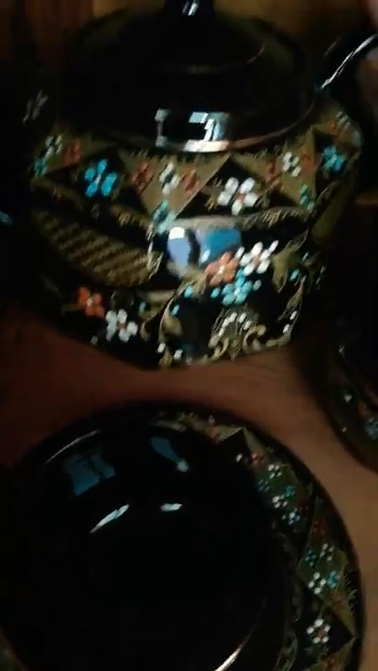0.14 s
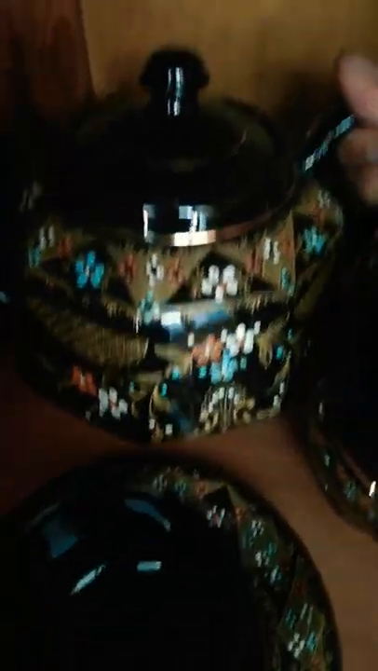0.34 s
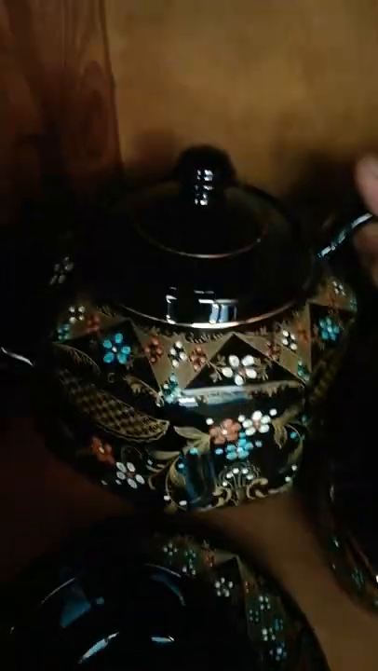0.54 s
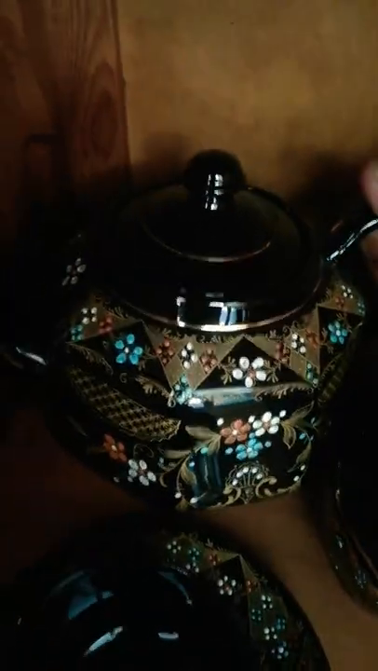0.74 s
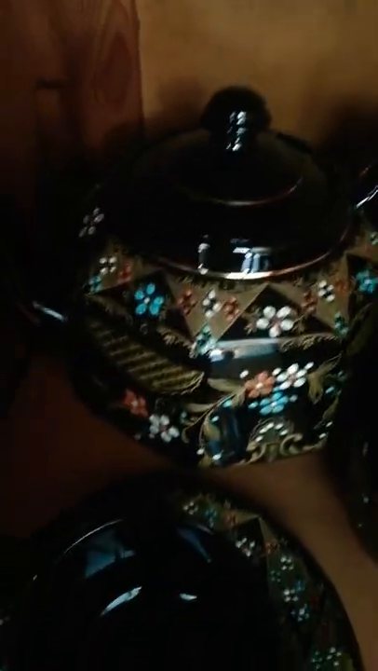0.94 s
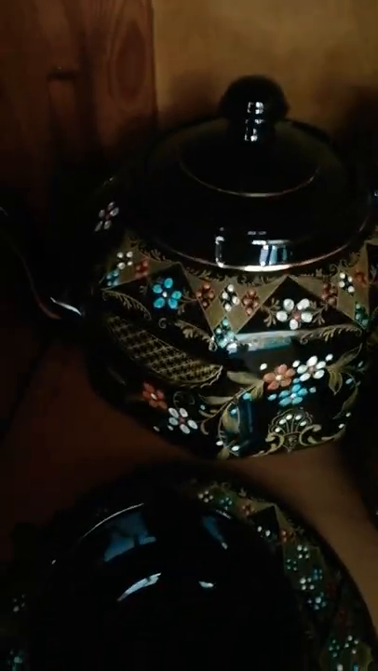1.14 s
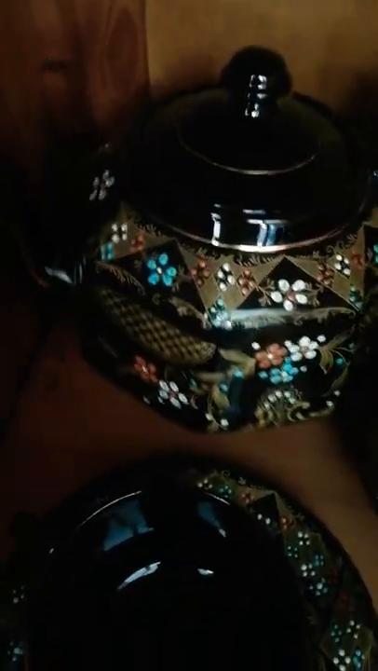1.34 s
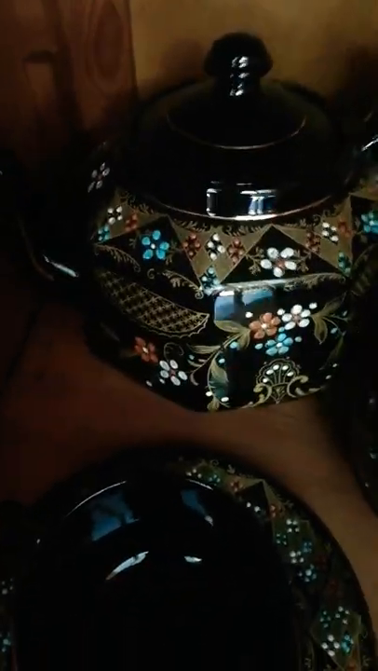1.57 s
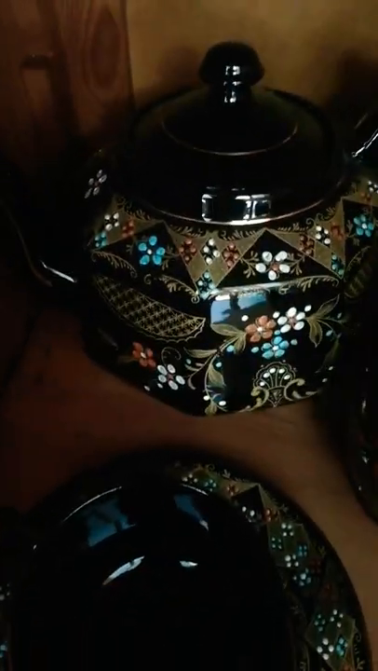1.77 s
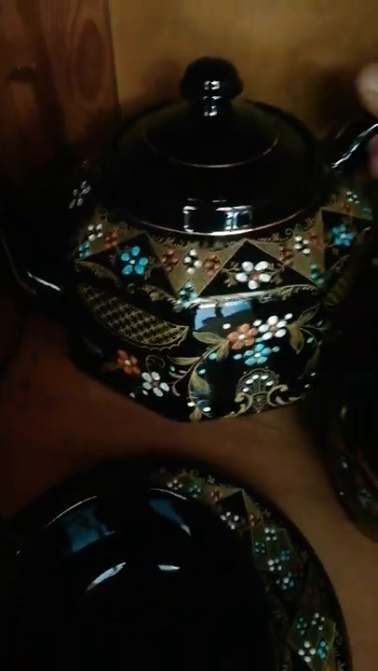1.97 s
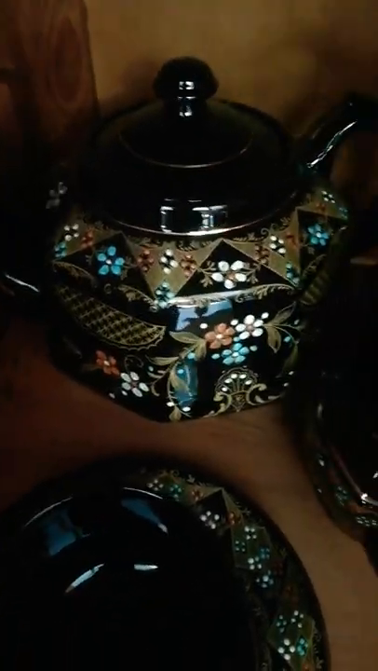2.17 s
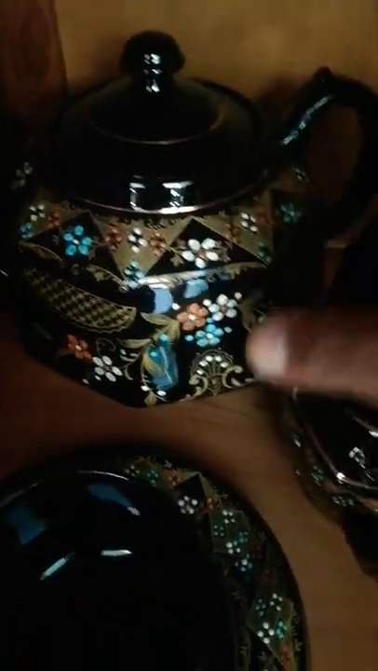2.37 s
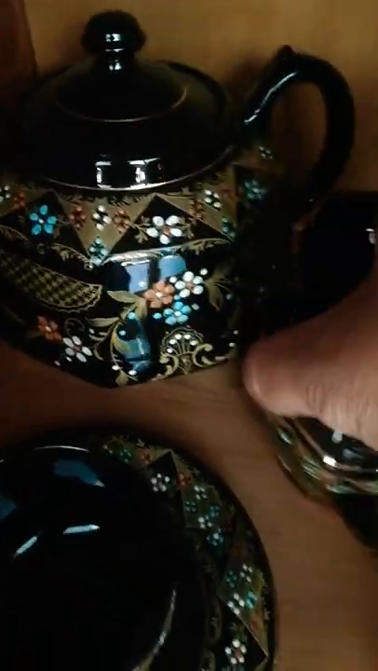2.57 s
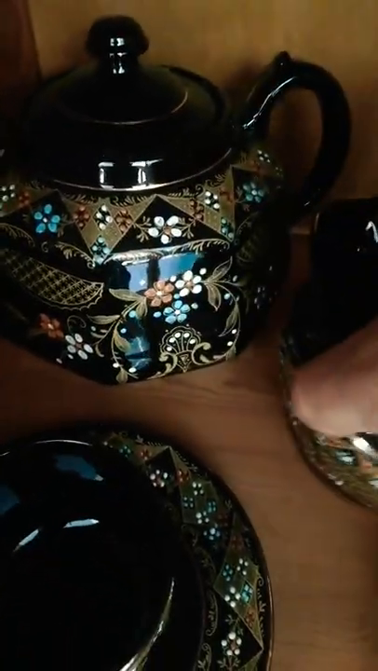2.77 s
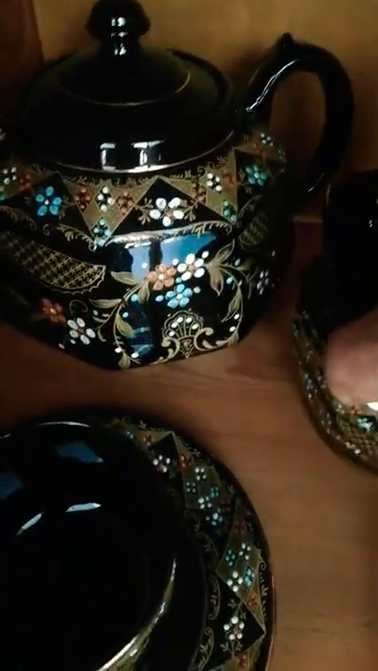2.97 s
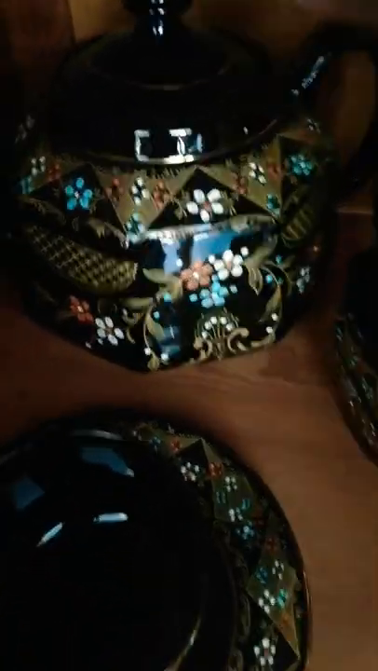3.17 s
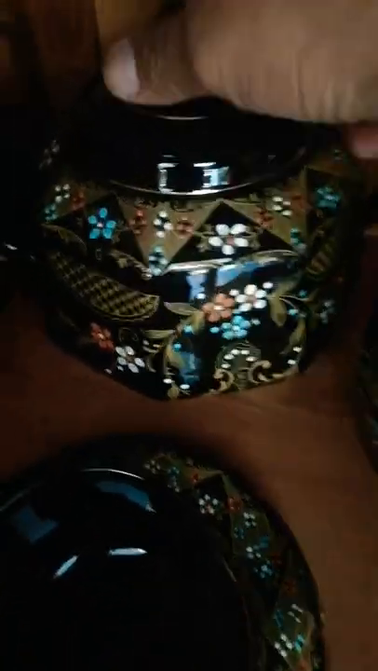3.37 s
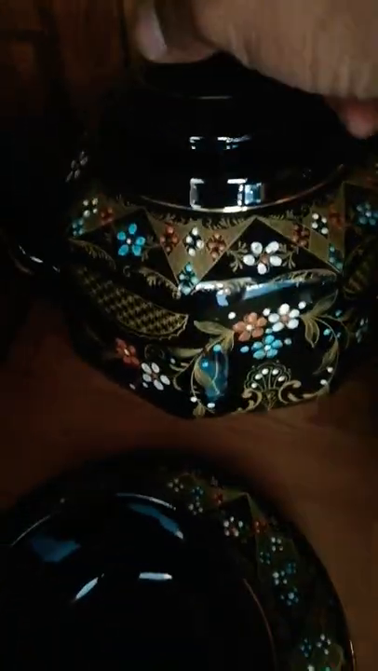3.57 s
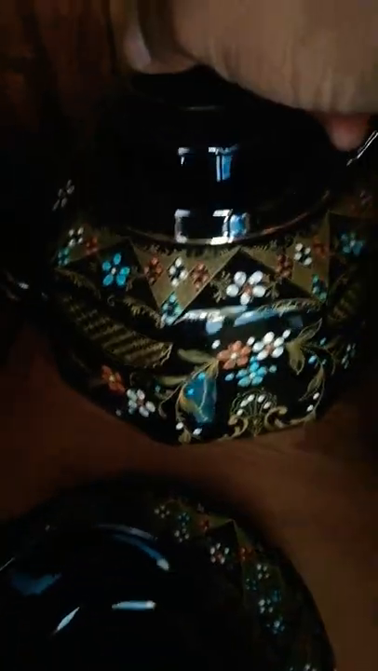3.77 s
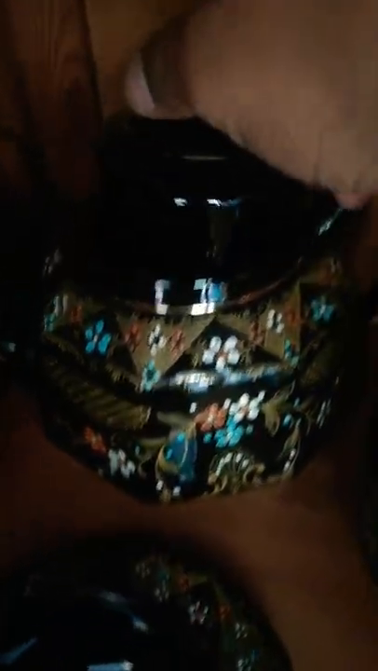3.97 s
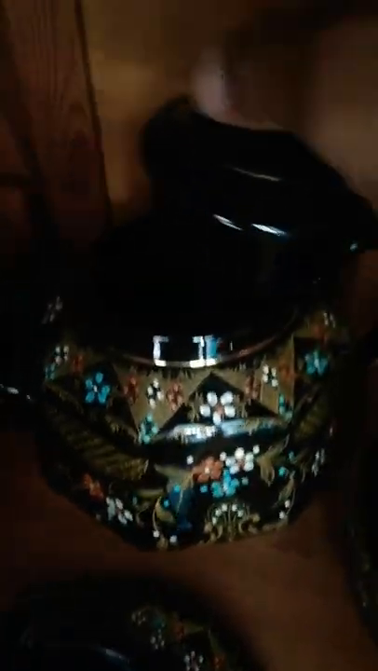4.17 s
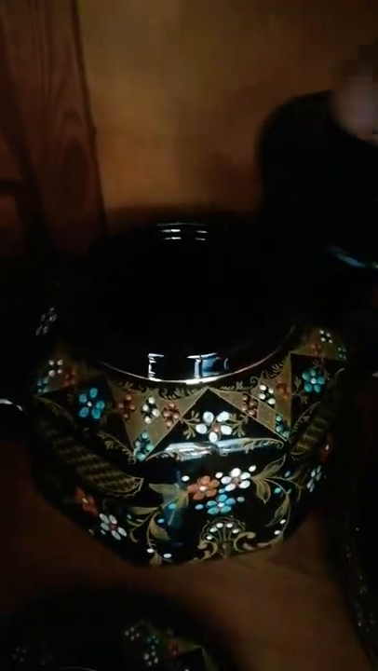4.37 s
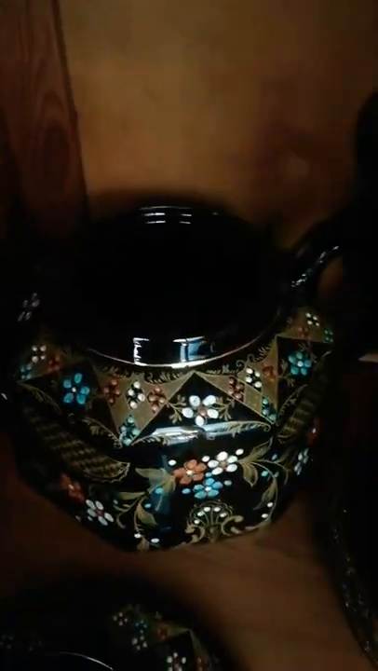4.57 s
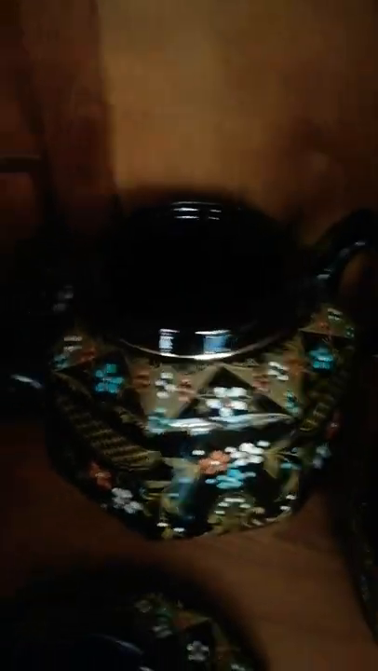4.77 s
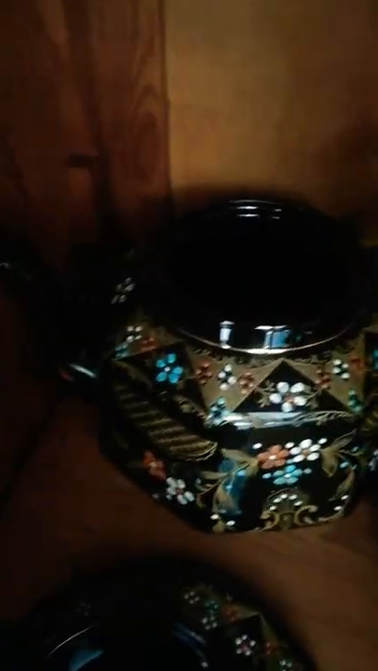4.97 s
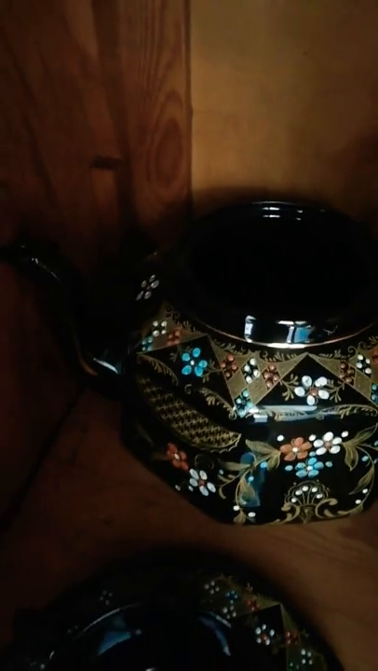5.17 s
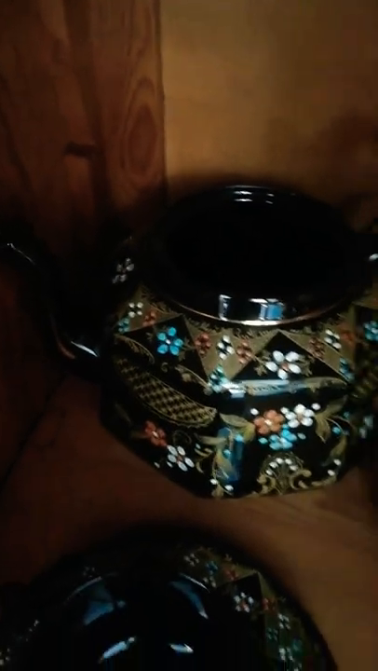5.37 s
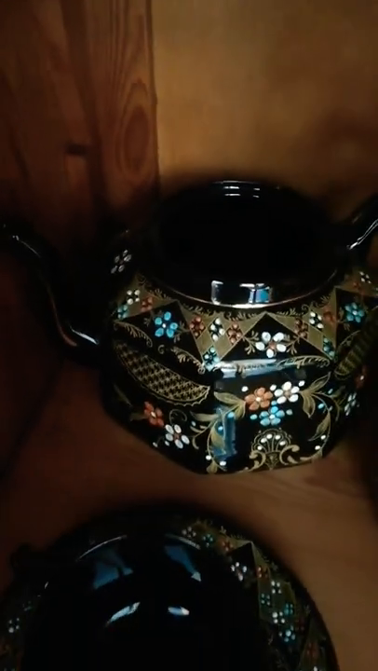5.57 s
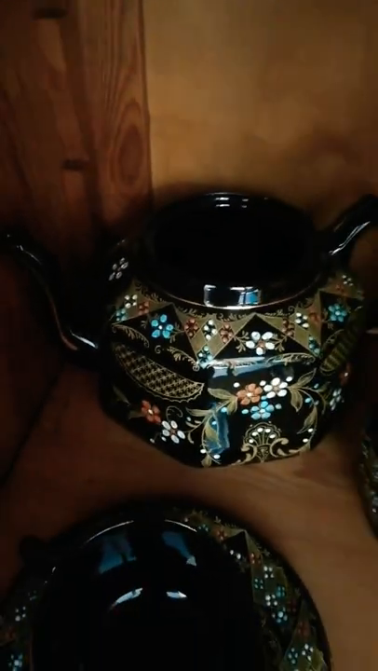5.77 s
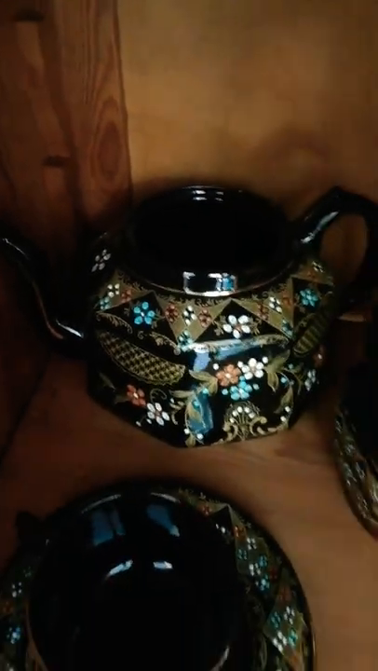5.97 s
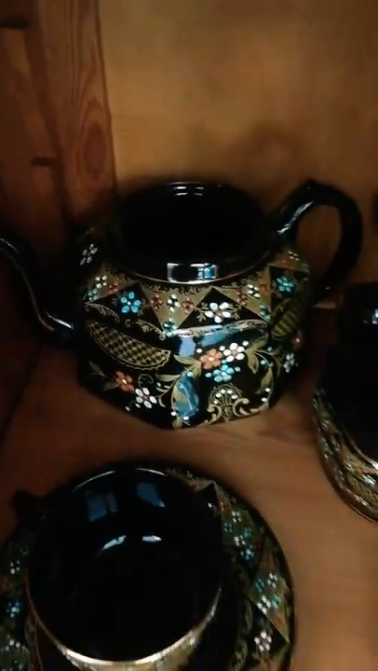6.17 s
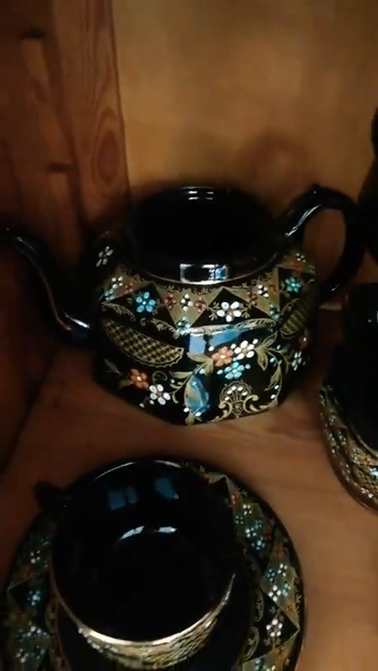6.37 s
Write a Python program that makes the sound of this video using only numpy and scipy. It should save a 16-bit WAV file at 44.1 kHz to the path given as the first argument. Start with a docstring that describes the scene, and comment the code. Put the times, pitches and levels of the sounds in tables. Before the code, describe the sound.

Close handling of a ceramic tea set: soft wooden bumps, gritty sliding, a hard teapot clunk, cup knocks, and a bright lid clink before near-silence.

```python
"""Glazed china is handled in a wooden cupboard, heard close by at two microphone ports.
At first the woodwork is bumped, stacked china clacks and pieces scrape along the shelf by stick-slip friction.
A teapot then knocks into the crockery as damped modes with a noisy crack; fingertips hiss over the glaze.
A cup and saucer slide and knock; then the teapot lid chatters in its seat and rings as it is lifted off.
Last comes a faint brush of skin; rumble and hiss of the room lie under everything."""
import sys
import numpy as np
from scipy import signal
from scipy.fft import rfft, irfft, next_fast_len
from scipy.io import wavfile
from scipy.ndimage import uniform_filter1d

SR = 44100
rng = np.random.default_rng(int(sys.argv[2]) if len(sys.argv) > 2 else 0)


def put_to_file(sound):
    """Save the sound as 16-bit audio at rate SR, in the file named by the first command-line argument."""
    columns = np.atleast_2d(sound).T  # one column per channel
    safe = np.clip(columns, -1, 1)
    whole_steps = np.round(safe * 32767)
    wavfile.write(sys.argv[1], SR, whole_steps.astype(np.int16))


N = 283563  # length [samples]
TOP_HZ = 15500  # upper limit of the sound
RING_TIME = np.arange(SR) / SR  # one second of ringing [s]


def undb(db):
    """Level law: decibels to amplitude gain."""
    return 10 ** (np.asarray(db) / 20)


def colour(x, points):
    """Linear filtering: shape x by (Hz, dB) points joined over log frequency."""
    hz, db = np.transpose(points)
    size = next_fast_len(x.shape[-1])
    bin_hz = np.arange(size // 2 + 1) * SR / size
    gain = undb(np.interp(np.log(bin_hz + 1), np.log(hz), db))
    return irfft(rfft(x, size) * gain, size)[..., :x.shape[-1]]


def tilted(points, tilt_db, pivot_hz):
    """Contact stiffness: a harder contact tips the spectrum towards the treble, in dB per octave."""
    return [(hz, db + tilt_db * np.log2(hz / pivot_hz)) for hz, db in points]


def field(points, size, grain=0., apart_hz=900):
    """Spatial coherence: noise of rms 1, alike at both ports in the bass and less so in the treble."""
    loudness = np.exp(grain * rng.standard_normal(size))  # grain makes the noise gritty
    mid, side = rng.standard_normal((2, size)) * loudness
    side = signal.sosfilt(signal.butter(1, apart_hz, "high", fs=SR, output="sos"), side)
    x = colour(np.array([mid + side, mid - side]), points)
    return x / np.sqrt(np.mean(x ** 2))


def decay(t60):
    """Exponential damping: 60 dB lost in t60 seconds."""
    return np.exp(-np.log(1000) * RING_TIME / t60)


def fade(t60, rise_s):
    """Transient response: a quick swell, then an exponential decay."""
    return (1 - np.exp(-RING_TIME / rise_s)) * decay(t60)


def walk(rate):
    """Slow random fluctuation: chance values, rate per second, joined by straight lines."""
    k = int(SR / rate)
    return uniform_filter1d(np.repeat(rng.standard_normal(N // k + 1), k), k)[:N]


def add(out, s, x):
    """Superposition: mix x in at time s."""
    i = int(s * SR)
    out[:, i:i + x.shape[1]] += x[:, :N - i]


def slips(size, rate, spread):
    """Stick-slip: lone slips of very unequal size, each a short burst in the gain on the friction."""
    slip_s = 0.001  # decay time constant
    size_db = spread * np.minimum(rng.exponential(size=size), 4)
    kicks = (rng.random(size) < rate / SR) * undb(size_db)
    return 1 + signal.lfilter([1], [1, -np.exp(-1 / (slip_s * SR))], kicks)


def stroke(start, end, edge_s):
    """Kinematics: a hand gathers pace, holds and comes to rest; a long stroke eases more slowly."""
    t = np.arange(N) / SR
    ease_s = edge_s + 0.08 * (end - start)  # a share of the stroke goes into gathering pace
    return (np.tanh((t - start) / ease_s) - np.tanh((t - end) / ease_s)) / 2


def contacts(knocks):
    """Repeated impact: each knock rebounds at widening gaps; gives (s, dB, brightness) in order."""
    gap_growth = 1.4  # a rocking piece works loose: each gap is this much longer than the last
    out = []
    for s, db, tilt_db, count, gap_s, loss_db in knocks:
        for k in range(round(count)):
            out.append((s, db - k * loss_db, tilt_db))
            s = s + gap_s * gap_growth ** k
    return sorted(out)


# wooden board under a blow: (frequency [Hz], relative density [dB per Hz])
BOARD_SPECTRUM = [(30, -23.5), (70, -10.5), (130, -6), (210, -8.5), (260, 11), (340, -18.5), (470, 9),
                  (580, -12), (760, 2), (1100, -14), (1600, -16.5), (3000, -32.5)]
# low boom of the cupboard: (frequency [Hz], relative density [dB per Hz])
RUMBLE_SPECTRUM = [(40, -20.5), (85, -3), (130, 8), (170, -8.5), (210, 7), (270, -2), (380, -18),
                   (700, -47.5)]


def board():
    """Structure-borne sound: a short wooden knock, with the cupboard's lows staying longer."""
    knock = fade(t60=0.19, rise_s=0.0013) * field(BOARD_SPECTRUM, len(RING_TIME))
    lows = fade(t60=0.49, rise_s=0.0013) * field(RUMBLE_SPECTRUM, len(RING_TIME))
    return knock + undb(-8.0) * lows


# between close contacts a piece still touches its seat: longest such gap [s],
# spread of its mode frequencies [share], factor on their damping
RATTLE_GAP_S, RATTLE_DETUNE, RATTLE_DAMPING = 0.04, 0.005, 1.25
BOARD_OCTAVES = 2.4  # the board answers this far below the china, so dull knocks shake it more


def china(hits, modes, crack, ring_db, minor_db, minor_t60, crack_db, crack_t60,
          grind_db, echo_db, board_db, pivot_hz):
    """Modal impact: each contact rings the modes, cracks sharply, grinds briefly and knocks the board."""
    out, span = np.zeros((2, N)), len(RING_TIME)
    # weak, short modes crowd between the strong ones
    minor_hz = rng.uniform(500, TOP_HZ, size=125)
    minor = [(f, minor_db + np.interp(f, *np.transpose(crack)), minor_t60) for f in minor_hz]
    hz, mode_db, t60 = np.transpose(list(modes) + minor)
    # short waves meet the two ports at different phases
    lean = np.pi / 4 * np.minimum(hz / 1400, 1) * rng.choice([-1, 1], len(hz))
    swing = 1e-9 * np.exp(1j * np.array([lean, -lean]))  # almost at rest
    # the near cupboard walls swell each blow for a few ms; the room adds a faint tail
    swell = 1 - np.exp(-RING_TIME / .0012)
    room_tail = undb(echo_db) * fade(t60=0.47, rise_s=0.0087)
    crack_shape = swell * decay(crack_t60) + room_tail
    grind_shape = undb(grind_db) * fade(t60=0.16, rise_s=0.004)

    blows = contacts(hits)
    gaps = np.diff([int(s * SR) for s, _, _ in blows] + [N])
    for (s, db, tilt_db), gap in zip(blows, np.clip(gaps, 1, span)):
        # every mode is a decaying rotation, followed until the next contact
        rattling = gap < RATTLE_GAP_S * SR
        bent_hz = hz * (1 + rattling * RATTLE_DETUNE * rng.standard_normal(len(hz)))
        damping = np.log(1000) / t60 * (RATTLE_DAMPING if rattling else 1)
        turn = np.exp((2j * np.pi * bent_hz - damping) / SR)
        rings = np.cumprod(np.broadcast_to(turn[:, None], (len(hz), gap)), axis=1)
        # the point of contact favours some high modes
        place_db = 3 * np.minimum(hz / 3000, 1) * rng.standard_normal(len(hz))
        size = undb(db + ring_db + mode_db + tilt_db * np.log2(hz / pivot_hz) + place_db)
        # the piece has moved a little
        shift = np.exp(1j * np.minimum(hz / 10000, 1) * rng.standard_normal((2, len(hz))))
        # a kick lands about a quarter turn off the running swing, so their energies add
        quarter_turn = 1j * rng.choice([-1, 1], len(hz))
        kick = size * quarter_turn * np.exp(1j * np.angle(swing)) * shift
        add(out, s, (swing @ rings + swell[:gap] * (kick @ rings)).imag)
        swing = (swing + kick) * rings[:, -1]

        grit = field(tilted(crack, tilt_db, pivot_hz), span, grain=0.93)  # glaze chatters on glaze
        grind = grind_shape * (slips(span, rate=250, spread=3.2) - 1)
        add(out, s, undb(db + crack_db) * (crack_shape + grind) * grit)
        add(out, s, undb(db + board_db - BOARD_OCTAVES * tilt_db) * board())
    return out


# ringing modes of the lid and the rim it sits in, with the cupboard's low mode at 458 Hz: (frequency [Hz],
# relative level [dB], free decay t60 [s])
LID_RINGING = [(458, -30, 0.53), (1526, -24.5, 0.24), (2015.4, -22, 0.68), (2690, -21, 0.3),
               (2720, -18.5, 0.46), (3200, -16.5, 0.36), (3370, -25.5, 0.35), (3800, -14.5, 0.36),
               (3704, -15.5, 0.52), (4245, -14, 0.25), (5728, -17.5, 0.14), (6030, -16.5, 0.13),
               (6492, -13, 0.17), (6659, -15.5, 0.16), (7660, -19.5, .09), (8360, -13.5, .1),
               (8560, -3, 0.15), (9700, -13.5, 0.11), (10080, -7, 0.1), (10300, -4.5, 0.1),
               (11600, -16.5, 0.11), (14230, -14.5, 0.1)]
# crack and minor modes of the lid: (frequency [Hz], relative density [dB per Hz])
LID_CRACK_SPECTRUM = [(300, -22.5), (1000, -9.5), (2200, -7.5), (3200, -5.5), (3900, 1), (5000, -10.5),
                      (6200, -5), (7200, -9.5), (8600, -0.5), (10400, -5.5), (12000, -7.5), (13500, -24.5),
                      (14400, -11.5), (15500, -30.5)]
# lid knocks: (time [s], relative level [dB], brightness [dB per octave], contacts [count],
# gap to the first rebound [s], loss per rebound [dB])
LID_KNOCKS = [(3.4995, -31.5, -3.5, 2, 0.0072, 1.5), (3.611, -20, -.5, 2, 0.03, 0),
              (3.689, -31, -2.5, 2, 0.035, 2.5), (3.8845, -13, 2, 3, 0.0055, 3.5),
              (3.911, -17.5, 1.5, 2, 0.013, 0.5), (3.94, -19, 2.5, 2, 0.0039, 1.5)]


def teapot_lid():
    """Modal ringing of a light shell: the lid chatters in its seat, bright and long."""
    return china(LID_KNOCKS, LID_RINGING, LID_CRACK_SPECTRUM, ring_db=5.0, minor_db=-17.5, minor_t60=0.1,
                 crack_db=-5.5, crack_t60=0.031, grind_db=-6.5, echo_db=-31.5, board_db=-14.0, pivot_hz=5986)


# ringing modes of the teapot body standing on the board:
# (frequency [Hz], relative level [dB], free decay t60 [s])
POT_RINGING = [(262, 3.5, 0.23), (461.3, -12, 0.3), (681, -11, 0.23), (1242, -6.5, 0.15),
               (1495.5, -22.5, 0.42), (1631, -26, 0.98), (2480, -8, 0.053), (3840, -17, 0.17),
               (4360, -25, 0.14), (5600, -16, 0.074), (6500, -16, 0.094), (8395, -6.5, 0.07),
               (10360, -12, 0.13), (10730, -11, 0.07)]
# crack and minor modes of the teapot: (frequency [Hz], relative density [dB per Hz])
POT_CRACK_SPECTRUM = [(100, -13.5), (300, -1.5), (900, 5), (1500, -1.5), (2500, -7.5), (3200, -12.5),
                      (5500, -13), (7200, -26.5), (8500, -20.5), (10500, -19), (13000, -26.5), (15500, -27)]
# teapot knocks: (time [s], relative level [dB], brightness [dB per octave], contacts [count],
# gap to the first rebound [s], loss per rebound [dB])
POT_KNOCKS = [(1.6735, -12.5, -4.5, 1, 0, 0), (1.682, -12.5, 1, 3, .008, 0.6),
              (1.710, -14, 1.5, 2, .014, 3), (1.785, -31.5, 0, 1, 0, 0)]


def teapot():
    """Modal ringing of a heavy shell: the pot knocks into the crockery, strongest in its low modes."""
    return china(POT_KNOCKS, POT_RINGING, POT_CRACK_SPECTRUM, ring_db=-2.0, minor_db=-14.5, minor_t60=.06,
                 crack_db=3.5, crack_t60=0.071, grind_db=-13.5, echo_db=-28.5, board_db=-10.0, pivot_hz=710)


# ringing modes of a cup: (frequency [Hz], relative level [dB], free decay t60 [s])
CUP_RINGING = [(1420, -13, 0.62), (1462, -12, 0.33), (2660, -5, 0.07), (3275, -7, .33), (4480, -3, 0.065),
               (6465, -1, 0.047), (9860, 0, 0.06)]
# crack and minor modes of cup, pressed and stacked china: (frequency [Hz], relative density [dB per Hz])
CUP_CRACK_SPECTRUM = [(200, -18), (800, 6.5), (1400, -3), (2100, -8), (2800, -9.5), (4500, -11.5),
                      (7000, -12), (10000, -13), (12500, -13.5), (15000, -40.5)]
# cup knocks: (time [s], relative level [dB], brightness [dB per octave], contacts [count],
# gap to the first rebound [s], loss per rebound [dB])
CUP_KNOCKS = [(2.644, -38, -3.5, 1, 0, 0), (2.665, -43.5, -4, 1, 0, 0), (2.8525, -29.5, 0, 1, 0, 0),
              (2.857, -26.5, 1, 1, 0, 0)]


def cup():
    """Modal ringing of a small shell: the cup knocks as it is slid aside."""
    return china(CUP_KNOCKS, CUP_RINGING, CUP_CRACK_SPECTRUM, ring_db=3.5, minor_db=-7.5, minor_t60=0.067,
                 crack_db=-3.0, crack_t60=0.049, grind_db=-14, echo_db=-16, board_db=-2.5, pivot_hz=1460)


# ringing modes of china pressed down onto its seat:
# (frequency [Hz], relative level [dB], free decay t60 [s])
PRESSED_RINGING = [(458, -13.5, 0.34), (766, 5.5, 0.072), (2760, -14, 0.15), (4450, -2.5, 0.057),
                   (9450, -8.5, 0.11)]
# knocks of pressed china: (time [s], relative level [dB], brightness [dB per octave], contacts [count],
# gap to the first rebound [s], loss per rebound [dB])
PRESSED_KNOCKS = [(.0995, -26.5, -0.4, 2, .0055, 0.46), (3.438, -24.5, .5, 2, .028, 5.9)]


def pressed_china():
    """Contact damping: china held down on its seat gives mostly short, dull modes."""
    return china(PRESSED_KNOCKS, PRESSED_RINGING, CUP_CRACK_SPECTRUM, ring_db=-2.0, minor_db=-11,
                 minor_t60=0.089, crack_db=-4.5, crack_t60=0.042, grind_db=-15, echo_db=-18.5,
                 board_db=-12.5, pivot_hz=1510)


# ringing modes of a piece damped by its stack:
# (frequency [Hz], relative level [dB], free decay t60 [s])
STACKED_RINGING = [(1020, 1, .08), (1260, 4, 0.08), (2640, -12, .2), (2826, -16, 0.33), (3569, -11, .17),
                   (4872, -7, 0.14), (7628, -5, 0.08), (10300, -4, 0.08)]
# knocks of stacked china: (time [s], relative level [dB], brightness [dB per octave], contacts [count],
# gap to the first rebound [s], loss per rebound [dB], negative for a gain)
STACKED_KNOCKS = [(.3725, -23, 1, 1, 0, 0), (.395, -32.5, 0.5, 2, .017, -2), (.590, -45, -7, 2, .022, 4),
                  (1.048, -38.5, -4.5, 1, 0, 0), (1.528, -42, -7, 1, 0, 0)]


def stacked_china():
    """Contact damping: a piece in a stack clacks with shortened modes."""
    return china(STACKED_KNOCKS, STACKED_RINGING, CUP_CRACK_SPECTRUM, ring_db=-7.5, minor_db=-15.5,
                 minor_t60=0.11, crack_db=1, crack_t60=0.013, grind_db=-16.5, echo_db=-25.5,
                 board_db=-13, pivot_hz=1448)


# pushes that slide a piece over the shelf:
# (start [s], end [s], relative scrape level [dB], hiss over scrape [dB])
PUSHES = [(0.218, 0.443, -54.5, 6), (0.465, 0.578, -56, -8), (0.72, 0.919, -50, -7),
          (1.027, 1.071, -49.5, -11), (1.122, 1.188, -60, 5.5), (1.284, 1.527, -48, -2.5),
          (1.589, 1.724, -45, 2), (2.569, 2.655, -46.5, -11), (2.641, 2.763, -40.5, -5),
          (2.772, 2.869, -49.5, -13), (2.857, 2.989, -41.5, -10.5)]
# scrape of the foot rings: (frequency [Hz], relative density [dB per Hz])
SCRAPE_SPECTRUM = [(250, -22.5), (470, 6), (600, -6), (800, 4.5), (1000, -5), (1400, -8), (2100, -16.5),
                   (2700, -15.5), (5000, -28.5)]
# hiss over the glaze: (frequency [Hz], relative density [dB per Hz])
HISS_SPECTRUM = [(900, -3), (1700, 2), (2800, -1.5), (3500, -1.5), (4200, -4), (6500, -2), (8200, -6),
                 (10500, 5), (12000, -2), (15000, -11)]
# the hand leans on the shelf and shakes it, ever more lightly
LEAN_START_S, LEAN_END_S, LEAN_DB, LEAN_EASE_DB_PER_S = 0.0045, 1.3, -34, 12


def sliding(rumble_db, scrape_db, hiss_db, uneven_db, wall_db, edge_s, linger_s):
    """Stick-slip friction: uneven slips shake the board, scrape the foot rings and hiss over the glaze."""
    rub, effort, i = np.zeros((2, N)), 0, np.arange(SR)
    for start, end, db, bright_db in PUSHES:
        speed = undb(db) * stroke(start, end, edge_s)
        first = int(start * SR) - SR // 10
        scrape = undb(scrape_db) * field(SCRAPE_SPECTRUM, SR, grain=0.9)
        hiss = undb(hiss_db + bright_db) * field(HISS_SPECTRUM, SR, grain=1.0)
        push = speed[first:first + SR] * (scrape + hiss) * slips(SR, rate=110, spread=0.92)
        # reflections from the cupboard walls comb each push differently, and shift as the piece moves
        drift = 1 + .08 * rng.standard_normal((2, 6, 1)) * i / SR
        lags = rng.uniform(SR / 1500, SR / 220, (2, 6, 1)) * drift
        echoes = np.array([sum(np.interp(i - lag, i, port) for lag in paths)
                           for port, paths in zip(push, lags)])
        add(rub, first / SR, push + undb(wall_db) * echoes)
        effort = effort + speed
    lean_db = LEAN_DB - LEAN_EASE_DB_PER_S * np.arange(N) / SR
    lean = undb(lean_db) * stroke(LEAN_START_S, LEAN_END_S, edge_s)
    keep = np.exp(-1 / (linger_s * SR))
    # the board booms on after a stroke
    rumble = signal.lfilter([1 - keep], [1, -keep], np.hypot(effort, lean))
    catch = undb(uneven_db * (walk(rate=38) + walk(rate=13)))  # the foot ring catches and lets go
    return rub * catch + undb(rumble_db) * rumble * field(RUMBLE_SPECTRUM, N)


# soft bumps of the hand against the woodwork: (time [s], level [dB], brightness [dB per octave])
HAND_BUMPS = [(0.042, -28, 6), (1.06, -35, 5), (1.232, -40.5, 0.5), (1.472, -26, -0.5), (1.53, -24.5, -4.5),
              (1.68, -20.5, 4), (2.045, -25.5, 2.5)]
# woodwork under a soft bump: (frequency [Hz], relative density [dB per Hz])
BUMP_SPECTRUM = [(30, -27.5), (50, -1.5), (75, -6), (120, 6.5), (200, -1), (280, -6.5), (400, -25.5),
                 (800, -45), (3000, -87.5)]
# decay of a neutral bump [s]; brightness that halves it [dB per octave]
BUMP_T60_S, BUMP_HALVING_DB = 0.3, 6.5


def bumps():
    """Soft impact: long contacts drive mainly low cupboard modes; the deeper the bump, the longer it booms."""
    out = np.zeros((2, N))
    for s, db, tilt_db in HAND_BUMPS:
        t60 = BUMP_T60_S * 2 ** (-tilt_db / BUMP_HALVING_DB)
        boom = field(tilted(BUMP_SPECTRUM, tilt_db, pivot_hz=120), SR)
        add(out, s, undb(db) * fade(t60, rise_s=0.0017) * boom)
    return out


# fingertips brushing the glaze: (start [s], end [s], relative hiss level [dB])
FINGER_BRUSHES = [(2.055, 2.112, -47.5), (2.12, 2.16, -52), (2.17, 2.508, -67.5), (4.573, 4.852, -63.5)]


def brushing(level_db, bright_db, edge_s):
    """Friction noise: skin on glaze gives a thin, high hiss and no ringing."""
    touch = sum(undb(db + level_db) * stroke(start, end, edge_s) for start, end, db in FINGER_BRUSHES)
    return touch * field(tilted(HISS_SPECTRUM, bright_db, pivot_hz=8000), N, grain=0.48)


# hiss of a dragged fingertip: (frequency [Hz], relative density [dB per Hz])
DRAG_SPECTRUM = [(9800, -27.5), (11400, -12), (13200, -33)]


def drag(start, end, level_db, edge_s):
    """Band-limited friction: a slowly dragged fingertip whispers in one narrow, high band."""
    return undb(level_db) * stroke(start, end, edge_s) * field(DRAG_SPECTRUM, N)


# light ticks of china: (time [s], level [dB])
CHINA_TICKS = [(0.52, -47), (1.97, -49)]


def ticks(t60):
    """Light impact: tiny dry bursts of noise, too light to ring anything."""
    out = np.zeros((2, N))
    for s, db in CHINA_TICKS:
        add(out, s, undb(db) * fade(t60, rise_s=0.001) * field(HISS_SPECTRUM, SR))
    return out


# room rumble and microphone hiss: (frequency [Hz], relative density [dB per Hz])
ROOM_SPECTRUM = [(100, -1.5), (200, -12), (300, -16), (800, -24.5), (2200, -27), (6000, -29),
                 (10000, -24.5), (15000, -26.5)]


def room(level_db, left_db):
    """Stationary noise: faint room rumble and microphone hiss, wavering slightly in level."""
    waver_db = .7 * walk(rate=6)
    balance_db = np.array([[left_db], [-left_db]])
    return undb(level_db + balance_db + waver_db) * field(ROOM_SPECTRUM, N, apart_hz=394)


def scene():
    """Superposition: all the handling over a quiet room."""
    knocks = teapot_lid() + teapot() + cup() + pressed_china() + stacked_china()
    rubbing = sliding(rumble_db=-4.5, scrape_db=-6, hiss_db=-6.0, uneven_db=1.7, wall_db=-3,
                      edge_s=0.0084, linger_s=0.055)
    skin = brushing(level_db=2.0, bright_db=3.0, edge_s=0.0033)
    skin = skin + drag(2.135, 2.457, level_db=-56.5, edge_s=0.026)
    return knocks + rubbing + bumps() + skin + ticks(t60=0.056) + room(level_db=-64.5, left_db=2.0)


# response of the two microphone ports: (frequency [Hz], gain [dB])
LEFT_RESPONSE = [(200, -1), (700, -0.15), (2000, -1), (4500, -1), (7000, -2), (8500, -5.5), (10000, -12.5),
                 (15000, -9)]
RIGHT_RESPONSE = [(200, -0.07), (700, 2), (2000, -3.5), (4500, -1.5), (7000, -2), (8500, 0.5), (10000, 1.5),
                  (15000, -2.5)]


def record(dry):
    """Transducer response: the right port hears more treble; loud peaks are rounded and the top is cut."""
    ports = np.array([colour(dry[0], LEFT_RESPONSE), colour(dry[1], RIGHT_RESPONSE)])
    rounded = 1.28 * np.tanh(ports / 1.142)
    return signal.sosfilt(signal.ellip(10, .2, 80, TOP_HZ, fs=SR, output="sos"), rounded)


dry = scene()
out = record(dry)
put_to_file(out)
```